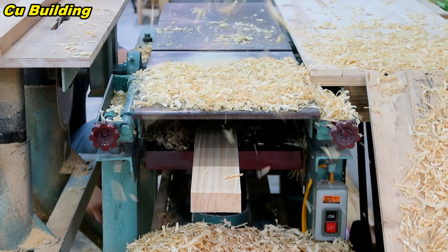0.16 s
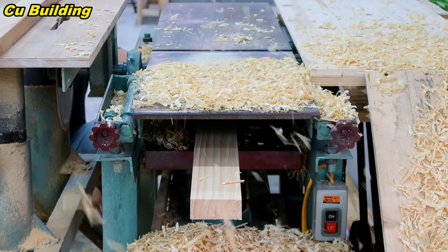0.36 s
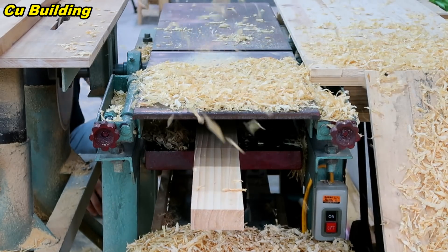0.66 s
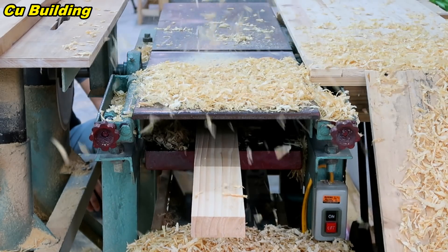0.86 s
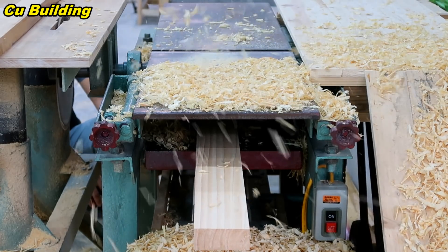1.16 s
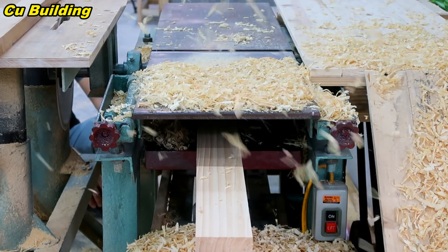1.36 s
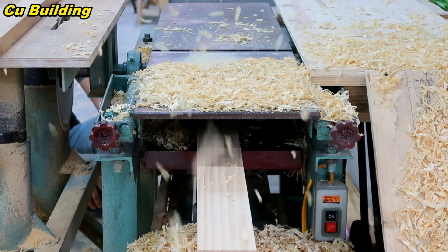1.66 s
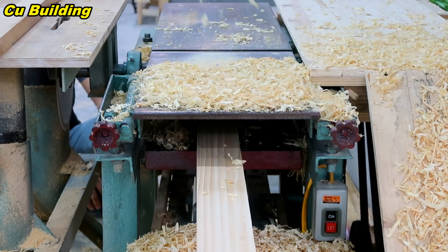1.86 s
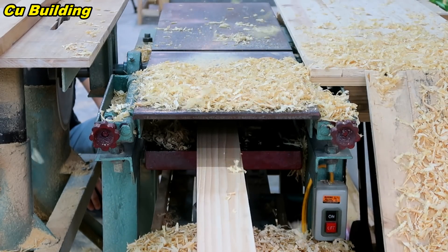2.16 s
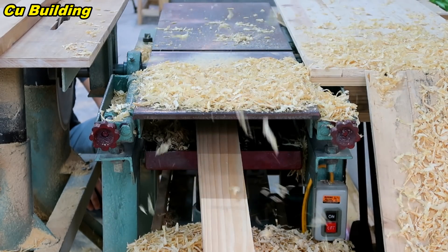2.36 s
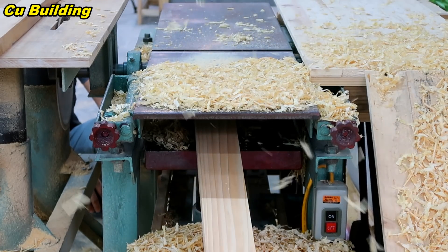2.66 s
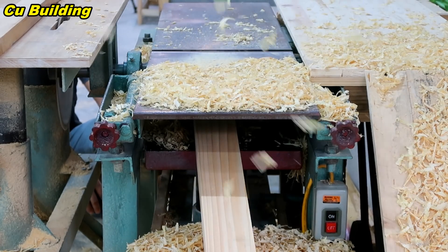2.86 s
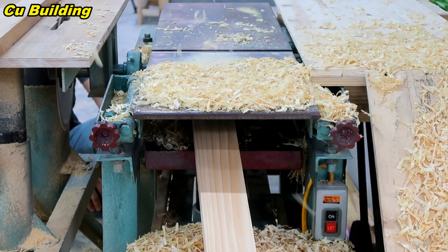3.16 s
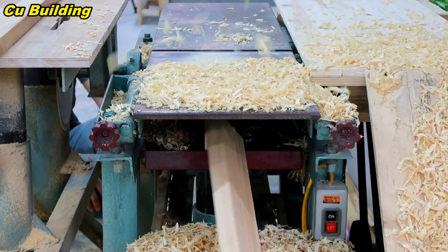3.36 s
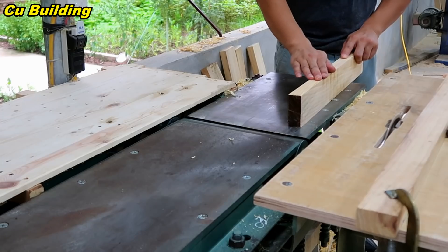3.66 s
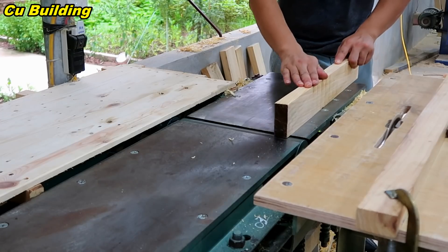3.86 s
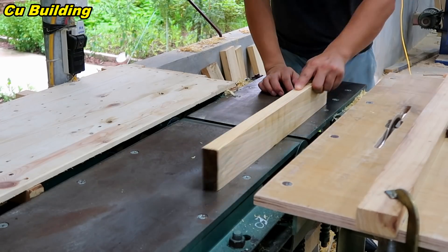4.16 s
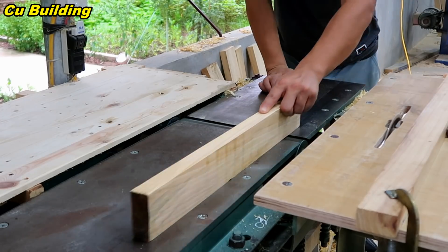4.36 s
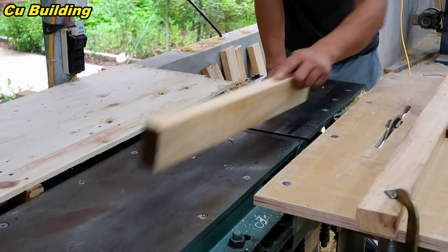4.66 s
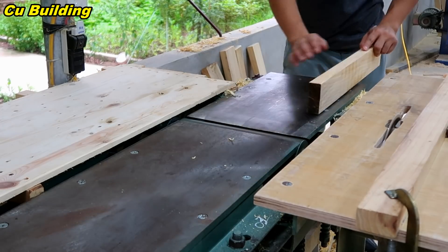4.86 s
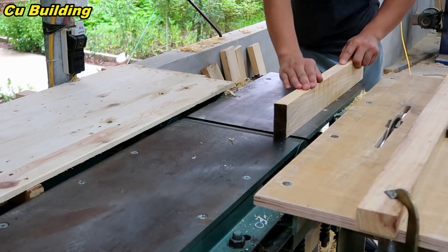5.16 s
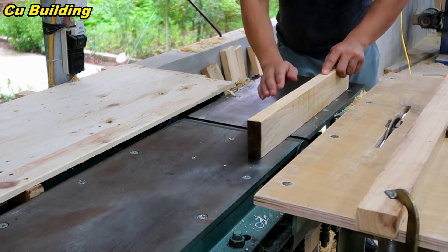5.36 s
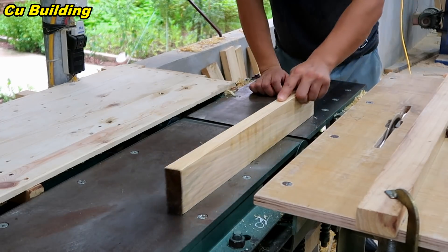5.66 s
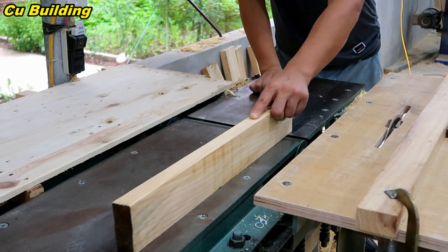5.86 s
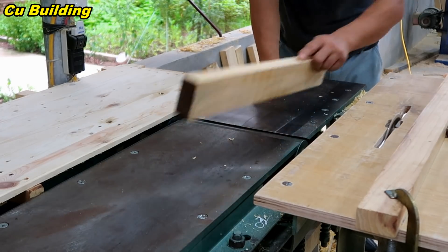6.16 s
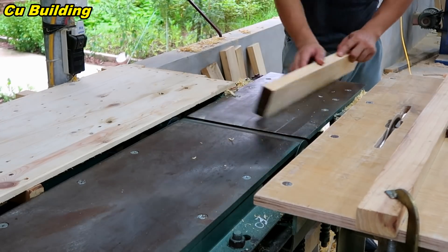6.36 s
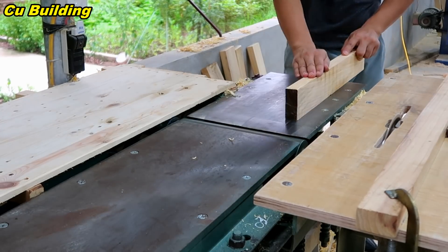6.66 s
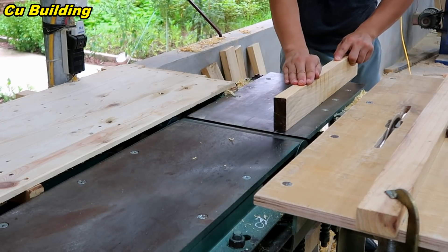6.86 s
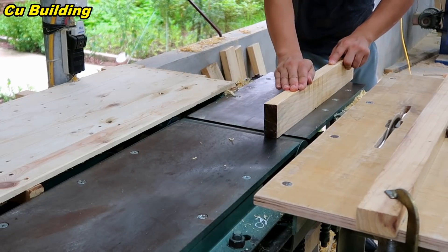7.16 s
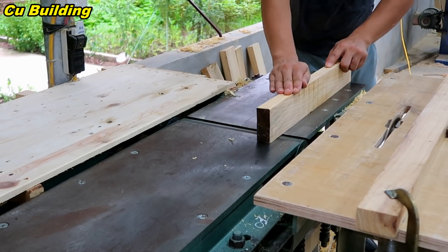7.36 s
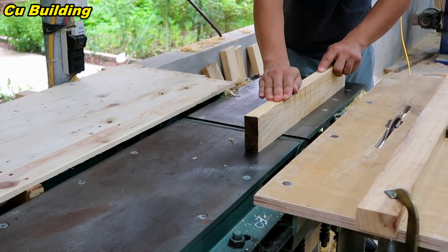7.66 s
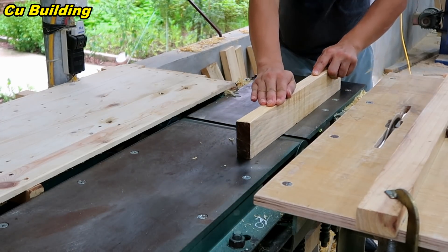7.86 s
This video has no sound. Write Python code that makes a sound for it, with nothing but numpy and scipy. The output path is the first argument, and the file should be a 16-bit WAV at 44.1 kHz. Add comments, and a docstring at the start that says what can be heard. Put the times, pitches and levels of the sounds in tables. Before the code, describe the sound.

Close to a thickness planer in an open workshop, a board howls harshly with spraying chips, chatters and squeals at its end, then a second board follows with a rattling feed. An abrupt change to beside a jointer brings a steady siren-like hum, wood knocks, two quick buzzing passes and a slower, even one.

```python
"""Three spinning knives of a woodworking machine howl through boards in an open workshop, at two places in turn.
First the thickness planer: each knife bite sounds the board and throws hissing chips; the feed gear rattles.
Then, beside the jointer table, the open cutter head hums as tones locked to its turning, and a board is edged
three times. Squeals lift the head's orders near a resonance; knocks on the table ring the modes of the board.
Rushing air lies underneath, and a gain control ducks the louder moments."""
import sys
import numpy as np
from scipy import signal
from scipy.fft import rfft, irfft, next_fast_len
from scipy.io import wavfile
from scipy.ndimage import uniform_filter1d, minimum_filter1d, map_coordinates

SR = 44100
rng = np.random.default_rng(int(sys.argv[2]) if len(sys.argv) > 2 else 0)


def dump_mix(stems):
    """Bounce the given channels to the path in sys.argv[1] as a 16-bit WAV at rate SR."""
    frames = np.atleast_2d(stems).T  # one column per channel
    limited = np.clip(frames, -1, 1)  # hard clip at full scale
    pcm = np.round(limited * 32767).astype(np.int16)
    wavfile.write(sys.argv[1], SR, pcm)


N = 354123
T = np.arange(N) / SR


def amp(db):
    """Decibels to gain."""
    return 10 ** (np.asarray(db) / 20)


def unit(x):
    """Scales to rms 1."""
    return x / np.sqrt(np.mean(x ** 2) + 1e-20)


def spectrum(points, hz):
    """Reads a table of (hz, level_db) as gains, interpolated over log frequency."""
    f, db = np.transpose(points)
    return amp(np.interp(np.log(hz + 1), np.log(f), db))


def colour(x, points):
    """Filters by a spectrum table."""
    size = next_fast_len(len(x))
    gains = spectrum(points, np.fft.rfftfreq(size, 1 / SR))
    return irfft(rfft(x, size) * gains, size)[:len(x)]


def drift(t, rate):
    """Slow random wander, straight lines between knots of rms 1 that come `rate` times a second."""
    knots = np.arange(0, 9, 1 / rate)
    return np.interp(t, knots, unit(rng.standard_normal(len(knots))))


def smooth(x, length, axis):
    """Moving average along one axis."""
    return uniform_filter1d(x, size=length, axis=axis)


def add(mix, s, sound):
    """Adds a sound at time s."""
    part = mix[max(round(s * SR), 0):][:len(sound)]
    part += sound[:len(part)]


def rotation(speed, waver=0.000418):
    """Turns of the cutter head so far; the belt lets the speed waver."""
    turns_per_s = np.interp(T, *np.transpose(speed)) * (1 + waver * drift(T, 25))
    return np.cumsum(turns_per_s) / SR


def bites(turns, decay=0.36, shallow=0.4, rest=0.29):
    """Three bites a turn; one knife stands proud and bites deepest."""
    knife, phase = np.divmod(3 * (turns % 1), 1)
    depth = np.where(knife == 0, 1, shallow)
    return rest + depth * np.exp(-phase / decay)


def knife_tone(turns, shape, sings, knife_db, wander_db, steady_turns, rough, size=2048, count=136):
    """Each turn draws nearly the same wave from the board; its orders swell and fade as the wood moves on."""
    order, turns = np.arange(count), turns - np.floor(turns[0])
    hz = order * np.mean(np.diff(turns)) * SR
    level_db = knife_db * (order % 3 == 0) + 0.  # three knives favour every third order
    freedom = np.ones(count)
    for k, db in sings:
        level_db[round(k)] += db
        freedom[round(k)] = 1 / 2  # orders on a resonance hold steadier
    steady = max(round(steady_turns), 2)

    def wander():
        """Random value for each turn and order, smoothed over several turns."""
        chance = rng.standard_normal((int(turns[-1]) + 2, count))
        return unit(smooth(smooth(chance, steady, 0), steady // 2, 0))

    swell, slip = wander(), wander()
    bitten_noise = rng.standard_normal(size) * bites(np.arange(size) / size)
    phase = np.angle(rfft(bitten_noise))[:count] + rough * slip * np.sqrt(order / count)
    lines = spectrum(shape, hz) * amp(level_db + wander_db * freedom * np.tanh(swell)) * (order > 0)
    waves = irfft(lines * np.exp(1j * phase), size)  # one wave per turn
    waves /= waves.std(axis=1, keepdims=True)
    return map_coordinates(waves, [turns, turns % 1 * size], order=1, mode="grid-wrap")


CUT_RISE_S, CUT_FALL_S = .02, 0.024  # the knives enter and leave the wood
BITE_S, BITE_TONE = .04, 0.53  # the first bite dies away; share of its dB in the tone
DEEPEST_SHARE = 0.23  # the hiss swells around its deepest point for this share of the cut


def cut(row, turns, shape, sings, chips, knife_db, wander_db, rough, grain_db, steady_turns=18, spray=0.49):
    """The board howls under the knives, louder as it runs out; bites throw puffs of chips over an even spray."""
    start, end, tone_db, hiss_db, growth_db, bite_db, deepest_s, deepest_db = row
    contact = np.minimum((T - start) / CUT_RISE_S, (end - T) / CUT_FALL_S)
    contact = np.clip(contact + .5, 0, 1)
    on, out = contact > 0, np.zeros(N)
    t, turns = T[on], turns[on]
    along = np.clip((t - start) / (end - start), 0, 1)
    entry_db = bite_db * np.exp(-np.maximum(t - start, 0) / BITE_S)
    depth_db = deepest_db * np.exp(-((t - start - deepest_s) / (DEEPEST_SHARE * (end - start))) ** 2)
    howl = knife_tone(turns, shape, sings, knife_db, wander_db, steady_turns, rough)
    puffs = rng.standard_normal(len(t)) * bites(turns, rest=spray)
    puffs *= amp(grain_db * np.tanh(drift(t, 1500)))
    tone = amp(tone_db + growth_db * along + BITE_TONE * entry_db) * howl
    hiss = amp(hiss_db + entry_db + depth_db) * unit(colour(puffs, chips))
    out[on] = tone + hiss
    return contact * out


def ragged(x, depth_db, patch_hz=190, patch_s=0.064, from_hz=6500):
    """The grain changes under the knives, so patches of the treble swell and fade."""
    window, hop = 512, 128
    hz, _, z = signal.stft(x, SR, nperseg=window, noverlap=window - hop)
    bins, frames = max(round(patch_hz / hz[1]), 1), max(round(patch_s / (hop / SR)), 1)
    patches = rng.standard_normal(z.shape)
    for _ in range(2):
        patches = smooth(smooth(patches, bins, 0), frames, 1)
    treble = np.minimum(hz / from_hz, 1)[:, None] ** 2
    gain = amp(depth_db * treble * np.clip(unit(patches), -2, 2))
    gain /= np.sqrt(np.mean(gain ** 2, axis=1, keepdims=True))  # keeps the mean colour
    return signal.istft(z * gain, SR, nperseg=window, noverlap=window - hop)[1][:len(x)]


# how a board answers the knives depends on how it is held
# COLOUR columns: hz [Hz], level_db [dB]; SINGS, the orders that sing out: order [per turn], above_colour_db [dB]
FIRST_COLOUR = [(130, -16), (400, -5), (1100, -9.5), (2200, 0.5), (3400, -2), (4600, 0.5), (5600, -4.5),
                (7300, 0.5), (8700, -7.5), (10300, -9), (12500, -31), (15500, -25)]
FIRST_SINGS = [(7, 9), (8, 15), (9, 12), (15, 5), (20, 4), (23, 12), (24, 8), (25, 6), (28, 12), (35, 6),
               (38, 8), (57, 4), (62, 7), (63, 7), (70, 9)]
LOOSE_END_COLOUR = [(130, -17), (400, -9.5), (1100, 0.5), (2200, -6), (3400, 0.5), (4600, -2), (5600, 0.5),
                    (7300, -1.5), (8700, -7), (10300, -3.5), (12500, -16), (15500, -23)]
LOOSE_END_SINGS = [(12, 4), (15, 5), (23, 5), (28, 6), (31, 7), (35, 6), (58, 6)]
SECOND_COLOUR = [(130, -25.5), (400, -3), (1100, -4.5), (2200, -2), (3400, -1.5), (4600, -1.5),
                 (5600, -4.5), (7300, -7.5), (8700, -6.5), (10300, -14), (12500, -16.5), (15500, -33)]
ENTRY_SINGS = [(6, 7), (12, 7), (24, 8), (27, 5)]
SECOND_SINGS = [(2, 12), (6, 5), (7, 11), (12, 3), (17, 7), (18, 1), (22, 6), (23, 12), (28, 11), (33, 6),
                (36, 3), (39, 2), (42, 8), (53, 8), (54, 5), (77, 9), (83, 12), (84, 7), (95, 10)]
# hiss of flying chips: hz [Hz], level_db [dB per Hz, relative]
PLANER_CHIPS = [(300, -21), (900, -1), (1500, -22), (2200, -4.5), (3500, 3), (4500, 1.5), (5400, -1.5),
                (6700, 4.5), (8500, -2.5), (10500, -3), (12500, -8), (15500, -15)]
# when the knives are in the wood: start_s [s], end_s [s]
PLANER_SPANS = [(-.6, .437), (.437, 1.052), (1.052, 1.48), (1.48, 3.5)]
# each of those cuts: tone_db [dB], hiss_db [dB], tone_growth_db [dB], first_bite_db [dB],
# deepest_after_s [s], extra_hiss_there_db [dB]
# in turn: first board held by both rollers; its end chatters past the infeed; the second enters; is drawn through
PLANER_CUTS = [(-19, -24.5, 3, 0, 1.0, 2), (-19.5, -27, 2.5, 7, 0.4, 7.5), (-27.5, -37, 4, 9, .44, 11),
               (-20.5, -25.5, 6, -4, 1.4, 1.8)]


def planer_cuts(turns):
    """One board runs out of the thickness planer, its freed end chattering, and the next follows."""
    held, loose, entering, drawn = (span + row for span, row in zip(PLANER_SPANS, PLANER_CUTS))
    first = cut(held, turns, FIRST_COLOUR, FIRST_SINGS, PLANER_CHIPS,
                knife_db=6.0, wander_db=4.0, rough=0.46, grain_db=7, spray=0.29)
    end = cut(loose, turns, LOOSE_END_COLOUR, LOOSE_END_SINGS, PLANER_CHIPS,
              knife_db=5.0, wander_db=7, rough=0.45, grain_db=7, spray=.25)
    second = sum(cut(row, turns, SECOND_COLOUR, sings, PLANER_CHIPS,
                     knife_db=7.0, wander_db=5.5, rough=0.47, grain_db=5.0)
                 for row, sings in ((entering, ENTRY_SINGS), (drawn, SECOND_SINGS)))
    return first + ragged(end, depth_db=2.5) + second


# answer of the board's edge, quick and slow: hz [Hz], level_db [dB]; order [per turn], above_colour_db [dB]
QUICK_EDGE_COLOUR = [(130, -15), (400, 2), (1100, -17), (2200, -0.5), (3400, -6), (4600, 4.5), (5600, -12),
                     (7300, 5), (8700, -24), (10300, -1.5), (12500, -17), (15500, -24)]
QUICK_EDGE_SINGS = [(2, 12), (12, 8), (15, 9), (21, 9), (30, 8), (33, 3), (36, 2), (51, 7), (77, 7),
                    (83, 7)]
SLOW_EDGE_COLOUR = [(130, -21), (400, -8), (1100, -25), (2200, -6), (3400, -4.5), (4600, 0), (5600, -11.5),
                    (7300, -6.5), (8700, -15), (10300, -4.5), (12500, -20), (15500, -34)]
SLOW_EDGE_SINGS = [(2, 9), (9, 11), (12, 14), (13, 11), (21, 7), (26, 7), (40, 6), (43, 11), (46, 9),
                   (50, 10), (62, 13), (63, 10)]
# hiss of flying chips, also the colour of splinters: hz [Hz], level_db [dB per Hz, relative]
JOINTER_CHIPS = [(300, -30), (900, -19), (1500, -22), (2200, -10), (3500, -10), (4500, -10), (5400, -6),
                 (6700, 3.5), (8500, -1), (10500, 0.5), (12500, -5), (15500, -8)]
# when the board is on the knives: start_s [s], end_s [s]
JOINTER_SPANS = [(3.858, 4.498), (5.175, 6.0), (7.04, 8.9)]
# each of those passes, the last a slow, even feed: tone_db [dB], hiss_db [dB], tone_growth_db [dB],
# first_bite_db [dB], deepest_after_s [s], extra_hiss_there_db [dB]
JOINTER_CUTS = [(-31.5, -39, 9.4, 15, .35, 11), (-23.5, -30.5, 1, 8, .42, 12.5), (-24, -30, .5, 3, .6, 0.5)]


def jointer_cuts(turns):
    """Two quick passes and a slow one cut the edge of a board."""
    *quick_passes, slow_pass = (span + row for span, row in zip(JOINTER_SPANS, JOINTER_CUTS))
    quick = sum(cut(row, turns, QUICK_EDGE_COLOUR, QUICK_EDGE_SINGS, JOINTER_CHIPS, knife_db=6.0,
                    wander_db=9.0, rough=1.0, grain_db=8.5, steady_turns=10.3, spray=.7)
                for row in quick_passes)
    slow = cut(slow_pass, turns, SLOW_EDGE_COLOUR, SLOW_EDGE_SINGS, JOINTER_CHIPS,
               knife_db=3.0, wander_db=6.0, rough=0.45, grain_db=12, spray=0.61)
    return ragged(quick, depth_db=4.5) + ragged(slow, depth_db=2.5)


# a resonance of the board catches the knives' rhythm for a moment
# start_s [s], end_s [s], pitch_hz [Hz], width_hz [Hz], level_db [dB]
PLANER_SQUEALS = [(-.1, .25, 2376, 60, -26), (.2, .47, 4752, 60, -24), (.4, .57, 7500, 121, -31),
                  (.38, .89, 1188, 50, -30), (.68, .92, 3550, 50, -24), (.69, .86, 7120, 110, -23),
                  (.84, 1.05, 5590, 69.6, -28), (.92, 1.06, 3560, 70, -25.5), (.93, 1.06, 7600, 180, -25),
                  (.95, 1.06, 2775, 70, -24), (.97, 1.06, 3170, 70, -28), (.97, 1.06, 5020, 300, -25),
                  (1.0, 1.1, 2383, 60, -28), (1.6, 2.15, 3670, 60, -34.5), (1.8, 2.4, 2383, 60, -30.5),
                  (2.85, 3.6, 2251, 60, -29), (2.95, 3.6, 3707, 60, -30)]
JOINTER_SQUEALS = [(3.85, 3.945, 3970, 280, -30), (4.14, 4.235, 7250, 190, -26), (4.2, 4.29, 3522, 70, -32),
                   (4.27, 4.48, 2064, 170, -26), (4.28, 4.38, 7260, 130, -33),
                   (4.35, 4.5, 3800, 190, -27.5), (5.175, 5.33, 3950, 70, -28),
                   (5.175, 5.36, 4550, 80, -29.5), (5.255, 5.47, 7210, 129, -23),
                   (5.27, 5.52, 4290, 100, -26), (5.41, 5.59, 2462, 70, -26.5),
                   (5.52, 5.63, 7100, 200, -24), (5.57, 5.7, 3550, 70, -26), (5.61, 5.69, 9500, 450, -21.5),
                   (5.69, 6.0, 2500, 100, -31), (5.78, 6.0, 4526, 120, -25.5),
                   (5.945, 6.012, 4700, 100, -21), (7.015, 7.11, 7300, 180, -30),
                   (7.04, 7.6, 4940, 220, -27.5), (7.0, 8.2, 4578, 60, -30), (7.38, 8.2, 7320, 110, -32.5)]
SQUEAL_EDGE, SQUEAL_ROUGH = .38, .18  # share of a squeal spent building up, and dying; unsteadiness of its lines


def squeals(rows, turns, knife_db=5):
    """A resonance swells and dies, lifting the orders of the head that lie near it."""
    out = np.zeros(N)
    for start, end, hz, width_hz, db in rows:
        on = (T > start) & (T < end)
        t, turn = T[on], turns[on]
        speed, along = np.mean(np.diff(turn)) * SR, (t - start) / (end - start)
        orders = round(hz / speed) + np.arange(-5, 6)
        lifts = np.exp(-((orders * speed - hz) / width_hz) ** 2) * amp(knife_db * (orders % 3 == 0))
        tone = np.zeros(len(t))
        for k, lift in zip(orders, lifts):
            level = lift * (1 + SQUEAL_ROUGH * drift(t, 70))
            phase = 2 * np.pi * (k * turn + rng.random()) + SQUEAL_ROUGH * drift(t, 150)
            tone += level * np.sin(phase)
        swell = np.sin(np.pi / 2 * np.minimum(np.minimum(along, 1 - along) / SQUEAL_EDGE, 1))
        out[on] += amp(db) * swell * unit(tone)
    return out


# a board jolting under the feed rollers, and wood striking the jointer table
# start_s [s], level_db [dB], pitch_factor [ratio], contact_decay_s [s], brightness_hz [Hz, low-pass]
JOLTS = [(2.348, -4, .98, .0005, 9000), (2.414, -13, .97, .0008, 9000), (3.432, -4.5, 1.2, 0.0013, 12000)]
KNOCKS = [(3.512, -10, 1.08, .008, 2800), (3.528, -10, .96, .035, 2200), (4.636, -16.5, .86, 0.022, 5000),
          (4.872, -9.5, .97, .002, 4000), (4.895, -11, .98, .006, 6000), (6.324, -1.5, .99, 0.0037, 9000),
          (6.366, 0, 1.04, .0013, 7000), (6.605, -3.5, 0.98, 0.0055, 14000)]
# modes of the planer frame and of the struck board: pitch_hz [Hz], level_db [dB, relative], t60_s [s]
FRAME_MODES = [(528, -5.5, 0.31), (690, 1.5, 0.022), (1130, 2.5, 0.018), (1895, 6, 0.019),
               (2720, -2.5, 0.1)]
BOARD_MODES = [(1045, -7.5, 0.054), (1440, -9, 0.038), (1967, 3, 0.08), (2050, -12.5, 0.43),
               (2650, 0.5, 0.01), (3420, -1, 0.049), (3710, 2, 0.044), (3880, -3, 0.036),
               (4310, -3.5, 0.088)]
# scrape of the contact: hz [Hz], level_db [dB]
CRACK_COLOUR = [(60, -60), (200, -10.0), (700, 1.0), (4000, 0.5), (9000, -8.0), (15000, -16)]


def knocks(rows, modes, crack_db=-2.0, room_db=-11, room_t60=0.4, detune=.018):
    """A short scraping contact rings close pairs of modes of what is struck; the workshop answers."""
    out, t = np.zeros(N), np.arange(SR // 4) / SR
    for s, db, pitch, contact, bright_hz in rows:
        ring = np.zeros(len(t))
        for hz, level, t60 in modes:
            for side in (-1, 1):
                mode_hz = hz * pitch * (1 + side * detune * rng.random())
                ring += amp(level - 60 * t / t60) * np.sin(2 * np.pi * mode_hz * t) / 2
        crack = colour(rng.standard_normal(len(t)) * np.exp(-t / contact), CRACK_COLOUR)
        hit = ring * (1 - np.exp(-t / 0.001)) * 0.45 + amp(crack_db) * crack * (1 - t / t[-1])
        hit = signal.lfilter(*signal.butter(2, min(bright_hz / SR, .45), fs=1), hit)
        room = rng.standard_normal(len(t)) * amp(-60 * t / room_t60)
        answer = signal.oaconvolve(hit, room / np.linalg.norm(room))[:len(t)]
        add(out, s, amp(db) * (hit + amp(room_db) * answer))
    return out


# splinters tearing out: start_s [s], level_db [dB], decay_s [s]
SPLINTERS = [(.425, -16.5, 0.008), (2.059, -23, .015), (5.55, -13, 0.022)]


def splinters():
    """Brief bright bursts of noise where the grain tears."""
    out, t = np.zeros(N), np.arange(SR // 8) / SR
    for s, db, decay in SPLINTERS:
        burst = unit(colour(rng.standard_normal(len(t)), JOINTER_CHIPS))
        add(out, s, amp(db) * np.exp(-t / decay) * burst)
    return out


# knives chopping air at the table lips: order [per turn], level_db [dB rms], change_while_covered_db [dB]
SIREN = [(1, -46.5, 0), (3, -25.5, 0.5), (6, -32, 0), (8, -43, -3), (9, -26, -5), (12, -38, 0.5),
         (15, -36, -1), (16, -45.5, 1), (18, -41, -1)]
COVER_S = 0.21  # the board slides over the gap in this time


def siren(turns):
    """The open head sings like a siren at whole multiples of its turning; a board over the gap alters the levels."""
    covered = sum(np.clip(np.minimum(T - start, end - T) / COVER_S, 0, 1) for start, end in JOINTER_SPANS)
    out = np.zeros(N)
    for k, db, cover_db in SIREN:
        level = amp(db + cover_db * covered + 0.41 * drift(T, 7))
        out += level * np.sin(2 * np.pi * (round(k) * turns + rng.random()))
    return np.sqrt(2) * out


# motor and belt tones: pitch_hz [Hz], level_db [dB rms]
DRIVE = [(220.7, -33.5), (441.4, -40), (781, -43), (882.9, -42)]


def drive():
    """Motor and belt hum as steady tones that waver slightly in level and phase."""
    out = np.zeros(N)
    for hz, db in DRIVE:
        level = amp(db + 0.71 * drift(T, 14))
        out += level * np.sin(2 * np.pi * hz * T + 0.23 * drift(T, 12))
    return np.sqrt(2) * out


# rattle of the feed rollers under load: time_s [s], level_db [dB]
FEED_LOAD = [(0, -41), (.6, -43), (1.1, -43), (1.5, -31.5), (2.1, -33), (2.5, -32), (3.44, -41)]
# its colour: hz [Hz], level_db [dB, relative]
FEED_COLOUR = [(45, -43), (90, -17.5), (180, -7), (230, 2.5), (320, 2), (450, -12), (1000, -8), (3000, -60)]


def feed(jitter=0.0062):
    """The feed gear knocks about 45 times a second, harder under load."""
    rate_hz = 45.2 * (1 + jitter * drift(T, 39.96))
    teeth = np.diff(np.floor(np.cumsum(rate_hz) / SR), prepend=0)  # one click a tooth
    rattle = colour(teeth * amp(2.3 * drift(T, 60)), FEED_COLOUR)
    return amp(np.interp(T, *np.transpose(FEED_LOAD))) * unit(rattle)


# air whirled by the head: hz [Hz], level_db [dB per Hz, relative]
PLANER_AIR = [(40, -41), (80, -27), (110, -13), (200, -8.5), (350, -4.5), (600, -13), (1500, -8.5),
              (3500, -13.5), (5200, -11), (6400, -4.5), (8000, -10), (10500, -41), (15500, -43)]
JOINTER_AIR = [(70, -29.5), (200, -8), (550, -15), (850, -8.5), (1400, -13.5), (2600, -14), (3500, -7.5),
               (4200, -14), (4900, -12), (5600, 0.5), (6200, -5.5), (8000, -16), (10000, -26.5),
               (15500, -39.5)]


def air(turns, shape, db, throb):
    """Rush of air round the head, throbbing as its three knives pass."""
    passing = 1 + throb * np.cos(2 * np.pi * 3 * turns)
    rush = rng.standard_normal(N) * passing * amp(0.79 * drift(T, 30))
    return amp(db) * unit(colour(rush, shape))


# cutter head speed: time_s [s], speed [turns per s]
PLANER_SPEED = [(0, 132.0), (.69, 132.0), (.91, 130.6), (1.02, 132.4), (3.3, 132.4), (3.44, 132.2)]


def planer():
    """All sound at the thickness planer, its knife sounds locked to one turning head."""
    turns = rotation(PLANER_SPEED)
    wood = planer_cuts(turns) + squeals(PLANER_SQUEALS, turns) + knocks(JOLTS, FRAME_MODES)
    return wood + feed() + air(turns, PLANER_AIR, db=-27.5, throb=0.12)


# cutter head speed: time_s [s], speed [turns per s]
JOINTER_SPEED = [(3.44, 117.4), (5.15, 117.4), (5.5, 117.1), (5.95, 117.25), (6.2, 117.45), (7.05, 117.45),
                 (7.5, 117.3), (8.03, 117.25)]


def jointer():
    """All sound beside the jointer table, its knife sounds locked to one turning head."""
    turns = rotation(JOINTER_SPEED)
    wood = jointer_cuts(turns) + squeals(JOINTER_SQUEALS, turns) + knocks(KNOCKS, BOARD_MODES)
    return wood + siren(turns) + drive() + air(turns, JOINTER_AIR, db=-22, throb=0.33)


# stereo width: hz [Hz], side_against_mid_db [dB]
WIDTH = [(40, -27), (170, -61), (350, -37), (700, -21.5), (1300, -41.5), (2800, -48), (5600, -18.5),
         (10000, -10), (14000, -1.5)]
MOVE_S = 3.44  # the listening place jumps from planer to jointer


def scene(side_db=0, size=4096):
    """Both places in turn; reflections make the treble differ between the two microphones."""
    moved = np.clip((T - MOVE_S) / 0.0069 + .5, 0, 1)
    mid = (1 - moved) * planer() + moved * jointer() + splinters()
    scatter = rng.standard_normal(size) * np.exp(-np.arange(size) / SR / .02)
    reflections = signal.oaconvolve(mid, scatter / np.linalg.norm(scatter))[:N]
    side = amp(side_db) * colour(reflections, WIDTH)
    return np.array([mid + side, mid - side])


EDGE_HZ = 15900  # upper band limit


def record(dry, ceiling_db=-21.5, sense_s=0.0035, attack_s=0.011, hold_s=0.094, recovery_db=18):
    """Gain control ducks at each peak, holds and creeps back (dB a second); then the band limit."""
    power = uniform_filter1d((dry ** 2).mean(0), max(round(sense_s * SR), 1))
    power_db = 10 * np.log10(abs(power) + 1e-12)
    hold = max(round(hold_s * SR), 2)
    over_db = np.maximum(power_db - ceiling_db, 0)
    over_db = -minimum_filter1d(-over_db, hold, origin=(hold - 1) // 2)  # holds each peak
    duck_db = np.maximum.accumulate(over_db + recovery_db * T) - recovery_db * T
    lag = np.exp(-1 / (attack_s * SR))
    duck_db = duck_db[0] + signal.lfilter([1 - lag], [1, -lag], duck_db - duck_db[0])
    low_pass = signal.firwin(511, EDGE_HZ, window=("kaiser", 9), fs=SR)
    return signal.oaconvolve(dry * amp(-duck_db), low_pass[None], "same")


dry = scene()
out = record(dry)
dump_mix(out)
```